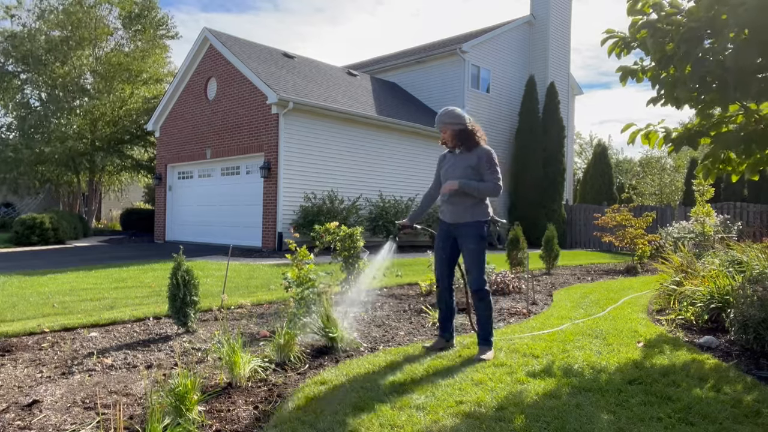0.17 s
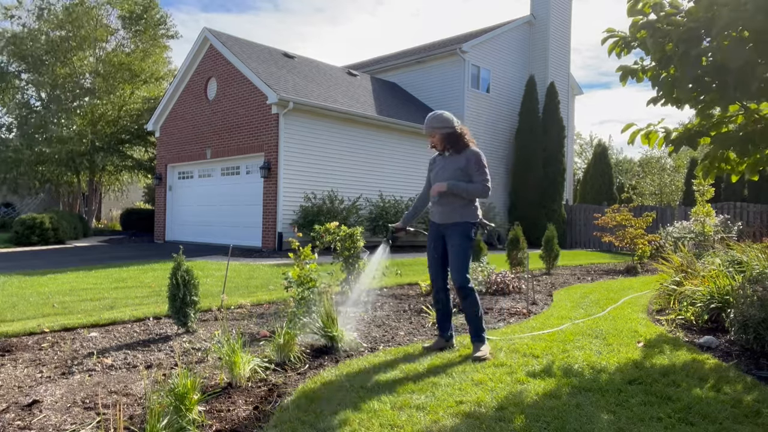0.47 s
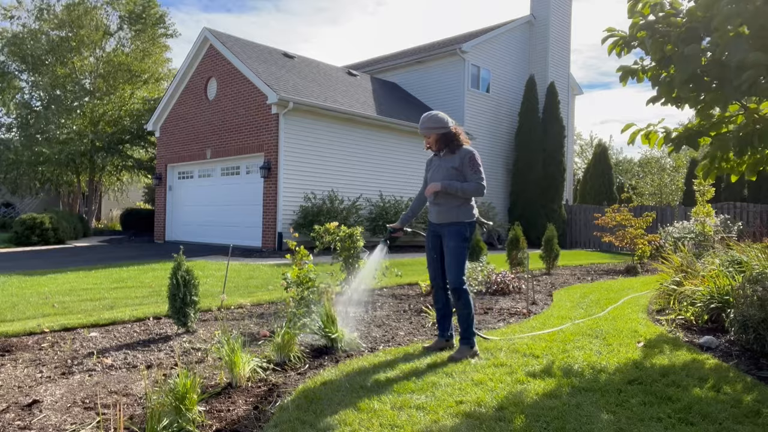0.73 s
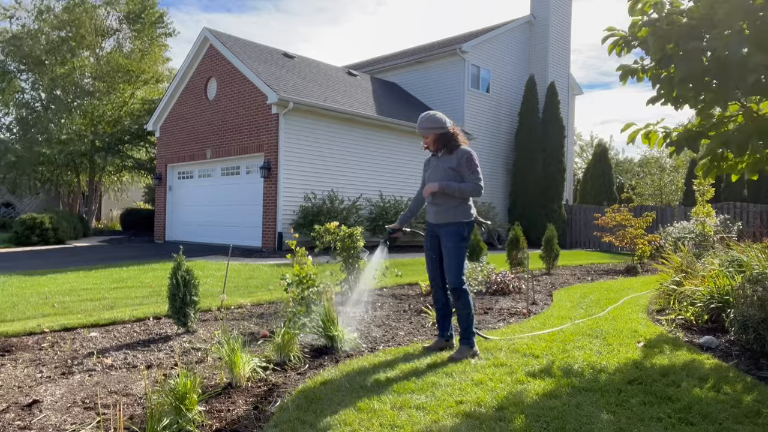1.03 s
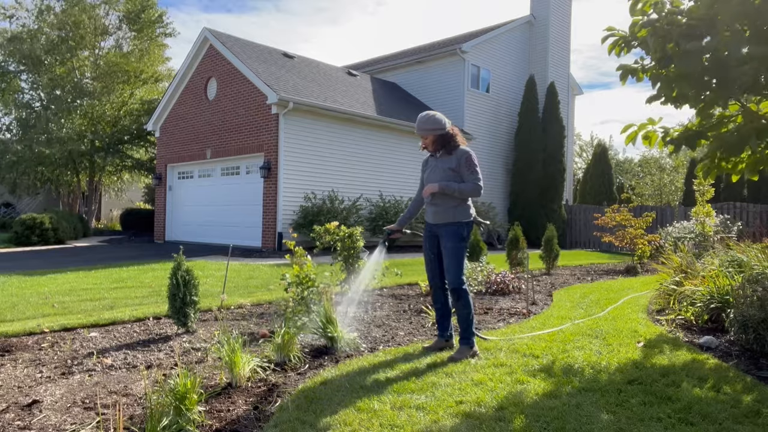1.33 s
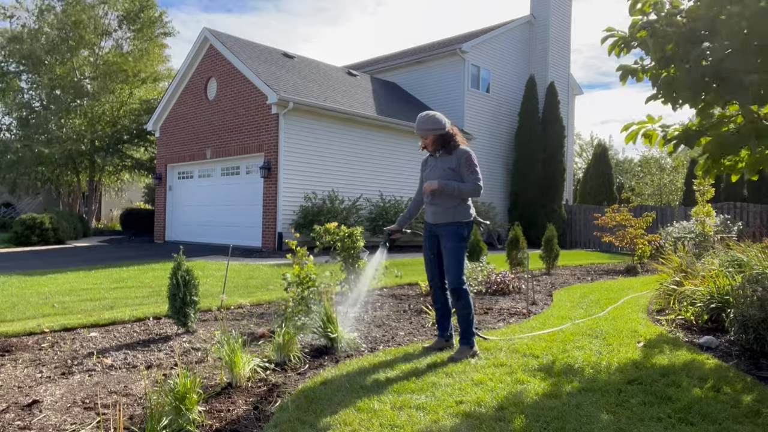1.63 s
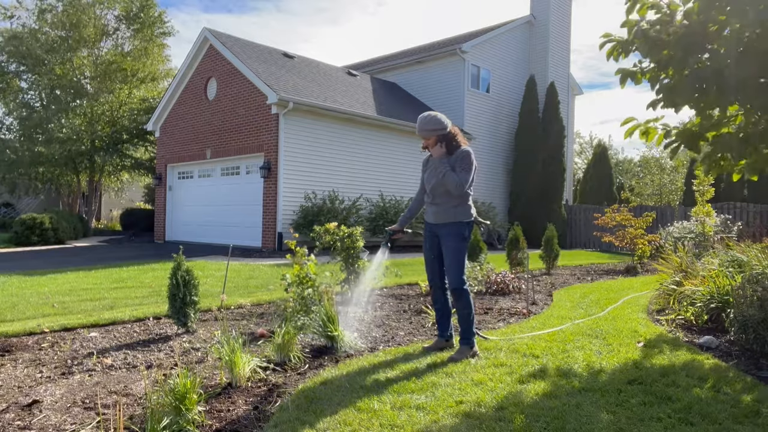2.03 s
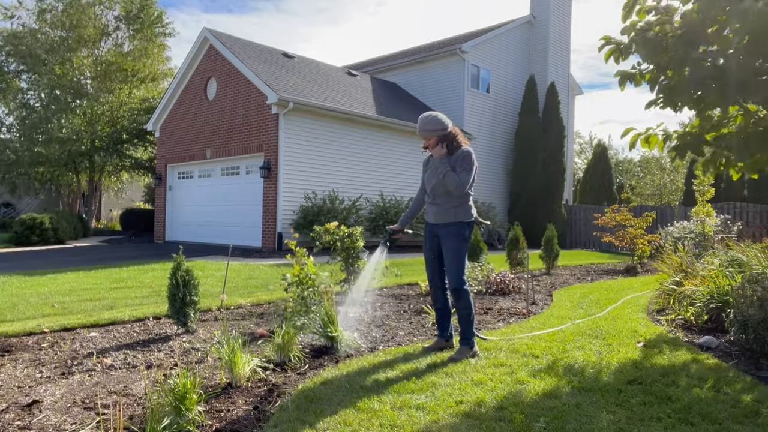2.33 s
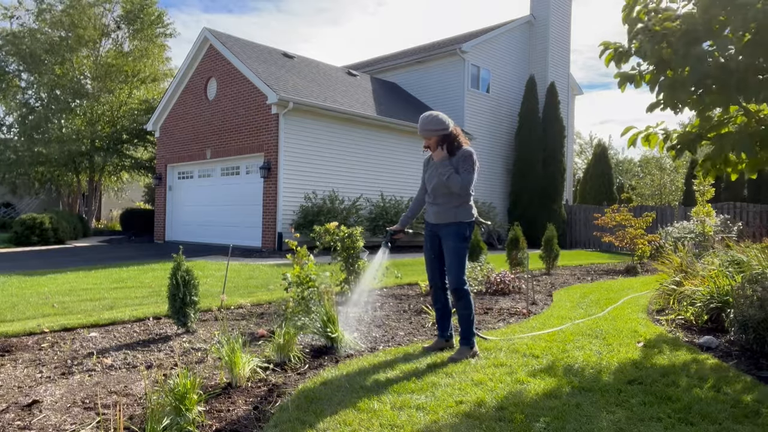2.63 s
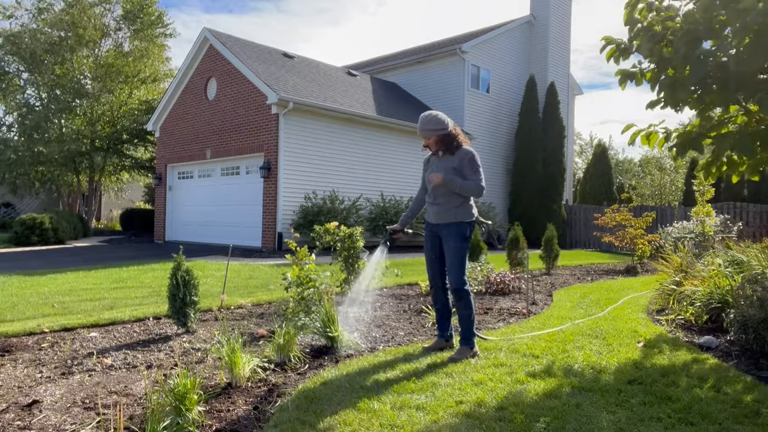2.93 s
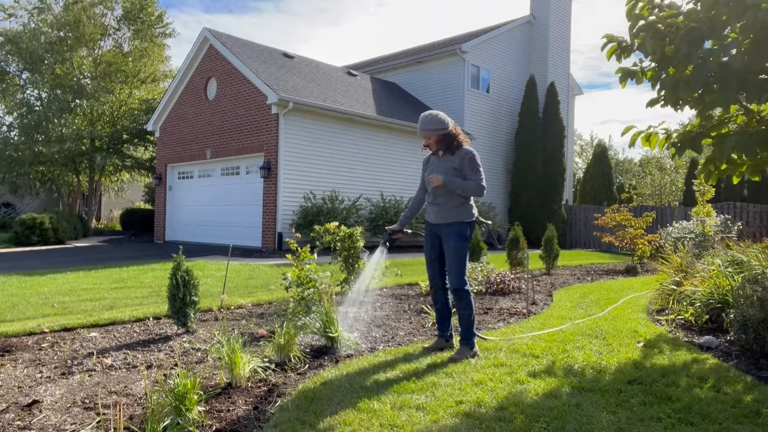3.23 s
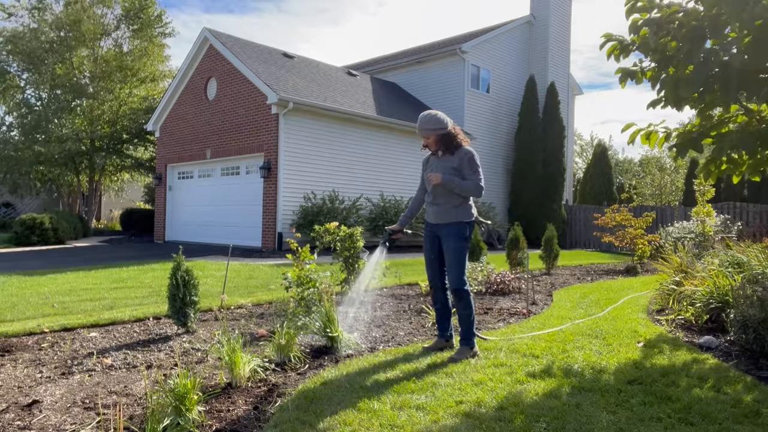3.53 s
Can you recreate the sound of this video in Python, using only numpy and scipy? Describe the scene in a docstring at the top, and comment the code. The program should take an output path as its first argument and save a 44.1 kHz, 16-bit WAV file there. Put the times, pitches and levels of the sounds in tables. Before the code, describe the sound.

A garden hose nozzle hisses steadily outdoors while wind buffets the microphone in the first half.

```python
"""In a garden, a hose nozzle sprays a planting bed some metres from the microphone.
The hiss of fine droplets is jet noise mixed with random ticks; dark bands drift through it as the nozzle swings.
Gusts buffet the microphone, die down and return: three bands of low noise follow level curves.
A far suburb murmurs behind as smooth filtered noise, with a narrow drone that swells."""
import sys
import numpy as np
from scipy import signal
from scipy.fft import rfft, irfft, next_fast_len
from scipy.io import wavfile
from scipy.ndimage import uniform_filter1d, map_coordinates

SR = 44100
rng = np.random.default_rng(int(sys.argv[2]) if len(sys.argv) > 2 else 0)


def elevation(decibels):
    """Turn decibel levels (scalar or array-like) into linear amplitude ratios."""
    levels = np.asarray(decibels, float)
    return 10 ** (levels / 20)


def unload_audio(sound):
    """Save the sound as a 16-bit wav file, at the path given as the first command line argument."""
    columns = np.transpose(np.atleast_2d(sound))
    # keep every value between -1 and 1, then stretch to whole-number steps
    steps = np.round(np.clip(columns, -1, 1) * 32767)
    wavfile.write(sys.argv[1], SR, steps.astype(np.int16))


N = 163170  # length in samples


def unit(x):
    """Normalisation: dividing by the root mean square gives x an rms of 1."""
    return x / np.sqrt(np.mean(x ** 2) + 1e-20)


def curves(rows, t):
    """Linear interpolation: each column after the time is read at times t."""
    times, *columns = np.transpose(rows)
    return [np.interp(t, times, column) for column in columns]


def wobble(rate):
    """Slow random modulation: a spline through random knots, rate of them a second."""
    knots = rng.standard_normal(int(N * rate / SR) + 4)
    return map_coordinates(knots, [np.arange(N) * rate / SR])


def coloured(x, points):
    """Linear filtering: the spectrum of x is weighted by a (Hz, dB) curve, then set to rms 1."""
    size = next_fast_len(N + 8192)
    point_hz, point_db = np.transpose(points)
    hz = np.fft.rfftfreq(size, 1 / SR)
    gain_db = np.interp(np.log(hz + 1), np.log(point_hz + 1), point_db)  # straight lines over log frequency
    return unit(irfft(rfft(x, size) * elevation(gain_db), size)[:N])


def painted(x, gain_db, patchy_db):
    """Time-varying filtering: short-time spectra take a gain over frequency and time plus random patches."""
    hz, t, spectra = signal.stft(x, SR, nperseg=512)
    patches = uniform_filter1d(rng.standard_normal(spectra.shape), size=12, axis=0)  # across frequency
    patches = uniform_filter1d(patches, size=10, axis=1)  # across time
    total_db = gain_db(hz[:, None], t) + patchy_db * unit(patches)
    return signal.istft(spectra * elevation(total_db), SR, nperseg=512)[1][:N]


def bell(hz, t, rows):
    """Spectral envelope: a Gaussian bump in dB whose centre frequency drifts and shivers."""
    centre_hz, height_db, width_hz = curves(rows, t)
    shiver = 1 + 0.0053 * np.interp(t * SR, np.arange(N), wobble(15))  # as a share of the centre
    return height_db * np.exp(-.5 * ((hz - shiver * centre_hz) / width_hz) ** 2)


def suburb():
    """Superposition of many distant sources: broadband noise for the murmur, narrow-band noise for the drone."""
    # Murmur spectrum. Each row: frequency in Hz, relative level in dB per Hz.
    murmur_colour = [(35, -46), (60, 0.5), (130, -24), (200, -21), (300, -13.5), (420, -6), (650, -7.5),
                     (1050, -8), (1450, -13), (3000, -19), (3900, -26.5), (6600, -120)]
    # Swell of the murmur. Each row: time in seconds, level in dB.
    murmur_level = [(0, -53.5), (1, -54), (1.8, -53), (2.2, -54.5), (2.65, -52), (3.1, -54), (3.55, -50.5),
                    (3.7, -54)]
    # Swell of the drone. Each row: time in seconds, level in dB.
    drone_level = [(2.1, -69), (2.4, -64), (2.65, -55), (2.9, -59.5), (3.3, -72.5), (3.45, -57), (3.7, -49)]
    drone_hz, skirt_hz = 335, 180  # 40 dB down one skirt away from the centre
    drone_colour = [(10, -120), (drone_hz - skirt_hz, -40), (drone_hz, 0), (drone_hz + skirt_hz, -40),
                    (20000, -120)]

    t = np.arange(N) / SR
    murmur_db, = curves(murmur_level, t)
    drone_db, = curves(drone_level, t)
    murmur = coloured(rng.standard_normal(N), murmur_colour)
    murmur = unit(painted(murmur, lambda hz, t: 0, patchy_db=0.86))
    drone = coloured(rng.standard_normal(N), drone_colour)
    return elevation(murmur_db) * murmur + elevation(drone_db) * drone


def wind():
    """Turbulent pressure on the microphone port: three bands of low noise, each with its own level curve."""
    # Deep push spectrum. Each row: frequency in Hz, relative level in dB per Hz.
    push_colour = [(8.8, -29), (15, 5.5), (38, 2.5), (70, 4.5), (91, -20), (150, -120)]
    # Rumble spectrum. Each row: frequency in Hz, relative level in dB per Hz.
    rumble_colour = [(41, -25), (70, 0.5), (124, 1), (190, -8.5), (250, -28.5), (420, -120)]
    # Flutter spectrum. Each row: frequency in Hz, relative level in dB per Hz.
    flutter_colour = [(110, -43), (190, -2), (258, -4.5), (900, -34.5), (1170, -59), (1980, -120)]
    # Gusts in the deep push. Each row: time in seconds, level in dB.
    push_level = [(0, -41), (.2, -31), (.4, -28), (.7, -34.5), (1, -26), (1.3, -31.5), (1.55, -41),
                  (1.65, -17.5), (1.75, -37.5), (1.92, -30), (2.13, -44), (2.6, -52.5), (3.35, -50.5),
                  (3.5, -32), (3.7, -43.5)]
    # Gusts in the upper two bands. Each row: time in seconds, rumble level in dB, flutter level in dB.
    gust_levels = [(0, -40.5, -47), (.1, -33.5, -44.5), (.25, -24.5, -35.5), (.4, -26, -33.5),
                   (.55, -26.5, -41.5), (.7, -30, -38.5), (.8, -29, -31.5), (1, -22.5, -35),
                   (1.12, -30, -35.5), (1.2, -24.5, -32.5), (1.43, -28, -41.5), (1.59, -24.5, -36),
                   (1.68, -23.5, -43.5), (1.75, -43, -46), (1.88, -35, -46.5), (2, -44, -56.5),
                   (2.08, -53.5, -63.5), (2.7, -56.5, -60.5), (3.34, -56.5, -65), (3.5, -43, -60),
                   (3.6, -46.5, -61), (3.7, -45, -76)]

    t = np.arange(N) / SR
    push_db, = curves(push_level, t)
    rumble_db, flutter_db = curves(gust_levels, t)
    push = elevation(push_db) * coloured(rng.standard_normal(N), push_colour)
    rumble = elevation(rumble_db) * coloured(rng.standard_normal(N), rumble_colour)
    flutter = elevation(flutter_db) * coloured(rng.standard_normal(N), flutter_colour)
    return push + rumble + flutter


def spray():
    """Jet turbulence and random droplet impacts: noise plus sparse ticks under a moving spectral envelope."""
    # Strength of the spray. Each row: time in seconds, level in dB.
    spray_level = [(0.0, -47.5), (0.32, -46.5), (0.35, -49), (0.51, -46.5), (0.56, -49.5), (0.63, -47),
                   (0.98, -45.5), (1.34, -44.5), (1.8, -45.5), (2.17, -44), (2.24, -47.5), (2.32, -43.5),
                   (2.44, -47), (2.63, -43), (2.67, -45.5), (3.33, -45.5), (3.49, -43), (3.7, -44.5)]
    # Hiss spectrum. Each row: frequency in Hz, relative level in dB per Hz.
    hiss_colour = [(700, -21), (1300, -24), (1890, -19), (2240, -8.5), (2750, -12.5), (3300, -5),
                   (3700, -4), (4700, -2.5), (5400, -2.5), (6200, -4), (7900, -3), (10000, -1.5),
                   (11500, -0.5), (13000, -1), (14500, 0.5), (15500, -4)]
    # Tilt of the droplet ticks. Each row: frequency in Hz, relative gain in dB.
    drop_tilt = [(2000, -5), (6000, -0.5), (13000, 0)]
    # Moving bright band of the hiss. Each row: time in seconds, centre in Hz, lift in dB, width in Hz.
    bright_band = [(0, 11300, 3.5, 600), (.5, 9200, 0.5, 500), (.9, 12000, -1, 700), (1.4, 11900, 2.5, 900),
                   (2.1, 12400, 0.5, 700), (2.4, 13000, 4.5, 800), (2.62, 13500, 1, 900),
                   (2.8, 13000, 1, 800), (2.9, 10100, 4.5, 700), (3.2, 10400, 5.5, 700),
                   (3.5, 9400, 2.5, 600), (3.7, 9300, -1, 600)]
    # Dark bands, likely where ground echoes cancel the jet; one list of rows for each band.
    # Each row: time in seconds, centre in Hz, depth in dB (negative brightens), width in Hz.
    dark_bands = [
        [(0, 4270, 8, 250), (.5, 4200, 8, 268), (1.2, 3960, 9.5, 250), (2, 4030, 11.5, 243),
         (2.6, 4080, 10.5, 222), (2.9, 4120, 5, 240), (3.2, 4380, 11.5, 240), (3.7, 4200, 5, 250)],
        [(0, 7000, 3, 400), (.45, 6200, 4, 603), (1, 6900, 4.5, 300), (1.9, 7300, 1.5, 250),
         (2.5, 7200, 1.5, 250), (3.1, 6150, 3, 250), (3.7, 6260, 1, 300)],
        [(0, 9400, 5, 450), (.25, 10200, 11, 450), (.55, 10900, 5, 400), (.75, 9800, 8, 600),
         (.95, 9300, 8.5, 550), (1.5, 9500, 8, 496), (2, 9000, 10, 260), (2.6, 9500, 7, 240),
         (2.9, 9300, 0, 250), (3.2, 8700, 6, 400), (3.7, 8800, -3, 400)],
        [(.9, 11700, 1.5, 300), (1.9, 11200, 2.5, 260), (2.5, 11700, 3, 260), (2.9, 11700, 7, 300),
         (3.2, 12400, 3, 350), (3.7, 10800, 10, 300)],
        [(0, 14600, -2, 300), (1, 14400, 5, 280), (1.7, 14200, 5, 260), (2.1, 13900, 3, 260),
         (2.6, 14700, 2, 280), (3.1, 14500, -1, 300), (3.7, 14200, 2, 300)],
    ]
    drops_per_s, drop_spread_db = 3200, 2.7
    drop_share = .29  # of the power, before the hiss colour
    sputter_db = 0.45

    hits = rng.random(N) < drops_per_s / SR
    strengths = rng.standard_normal(N) * elevation(drop_spread_db * rng.standard_normal(N))
    drops = coloured(hits * strengths, drop_tilt)
    jet = rng.standard_normal(N)
    hiss = coloured(np.sqrt(drop_share) * drops + np.sqrt(1 - drop_share) * jet, hiss_colour)

    def envelope_db(hz, t):
        """Superposition in dB: the bright band less the dark bands."""
        return bell(hz, t, bright_band) - sum(bell(hz, t, rows) for rows in dark_bands)

    level_db, = curves(spray_level, np.arange(N) / SR)
    level_db = level_db + sputter_db * wobble(15)
    return elevation(level_db) * unit(painted(hiss, envelope_db, patchy_db=1.06))


def scene():
    """Linear superposition: the pressures of all sources add on one channel."""
    return (suburb() + wind() + spray())[None]


def low_pass(x):
    """Removes everything above the highest recorded frequency."""
    return signal.sosfilt(signal.butter(12, 17000, fs=SR, output="sos"), x)


def record(dry):
    """Band limiting: the camera's sharp low-pass removes every component from 15720 Hz up."""
    passed = np.fft.rfftfreq(N, 1 / SR) < 15720
    mix = irfft(rfft(dry) * passed, N)
    return low_pass(mix)


dry = scene()
out = record(dry)
unload_audio(out)
```